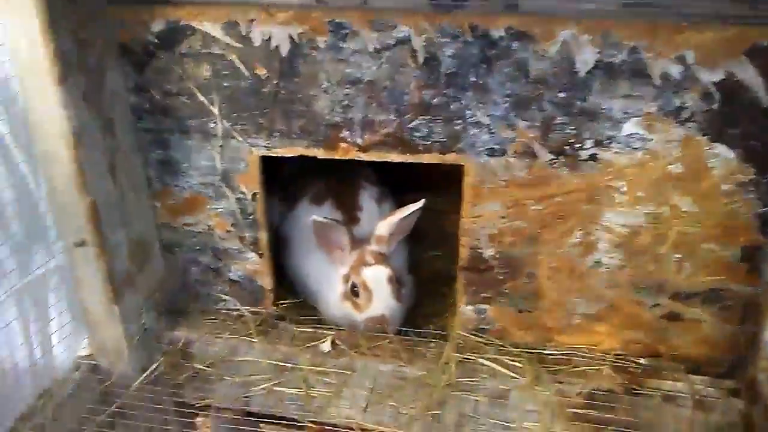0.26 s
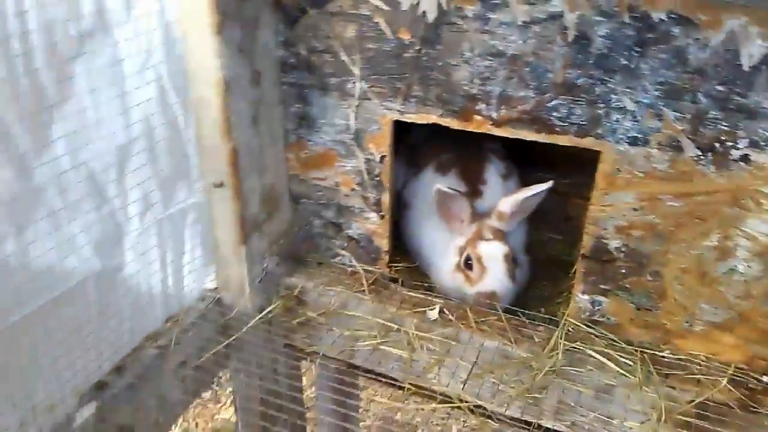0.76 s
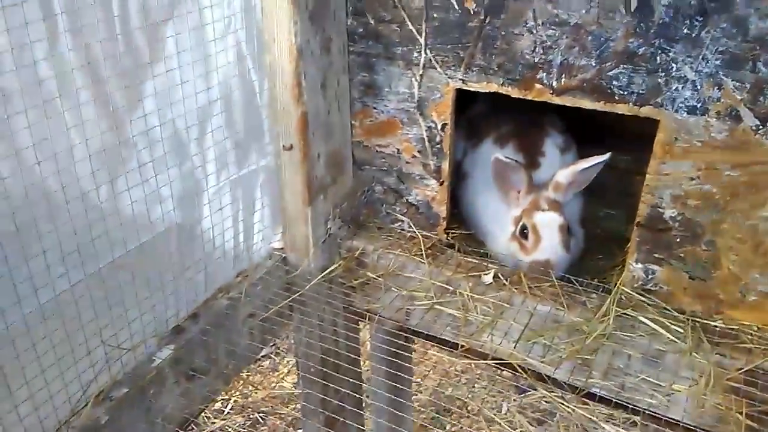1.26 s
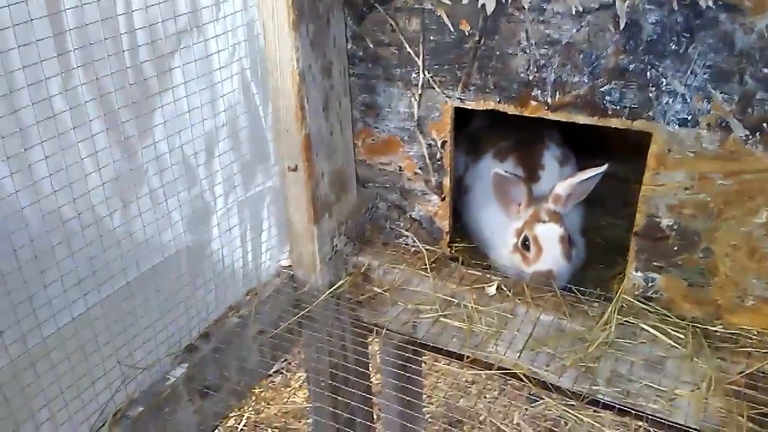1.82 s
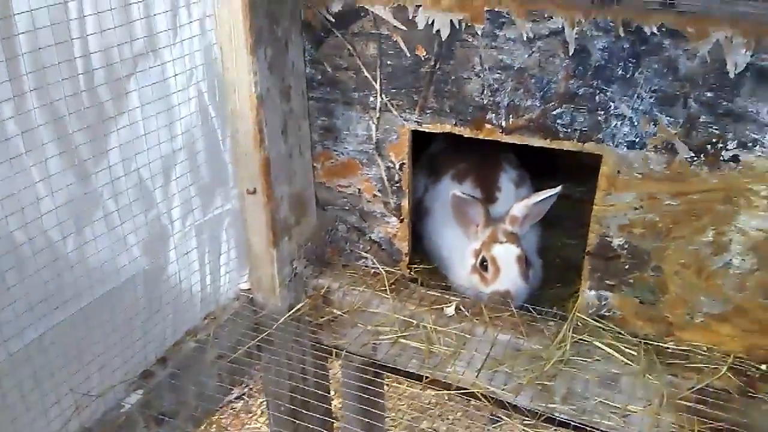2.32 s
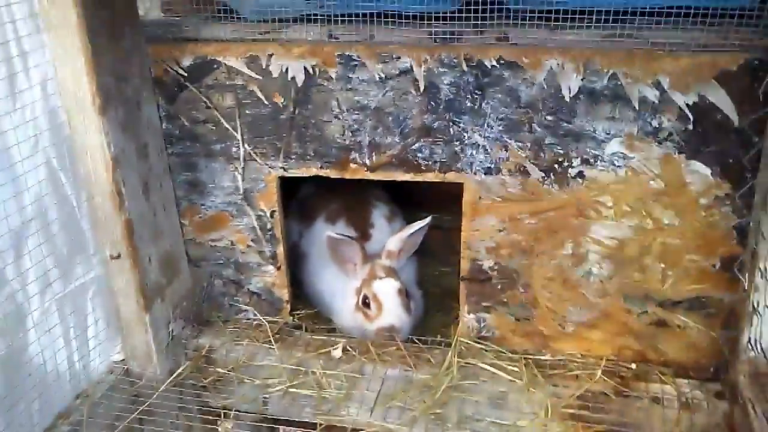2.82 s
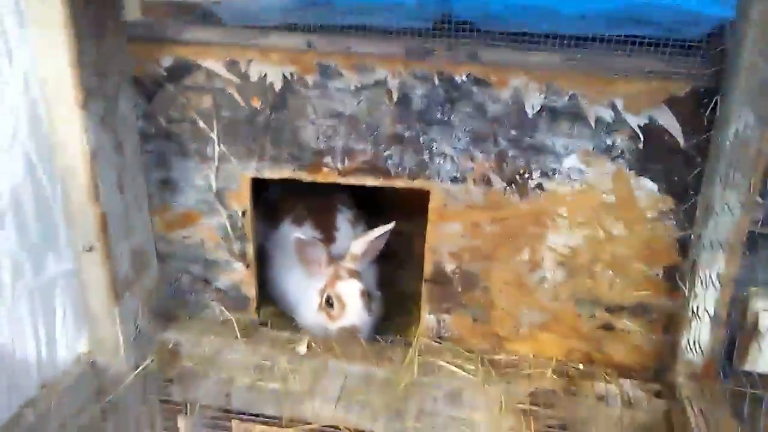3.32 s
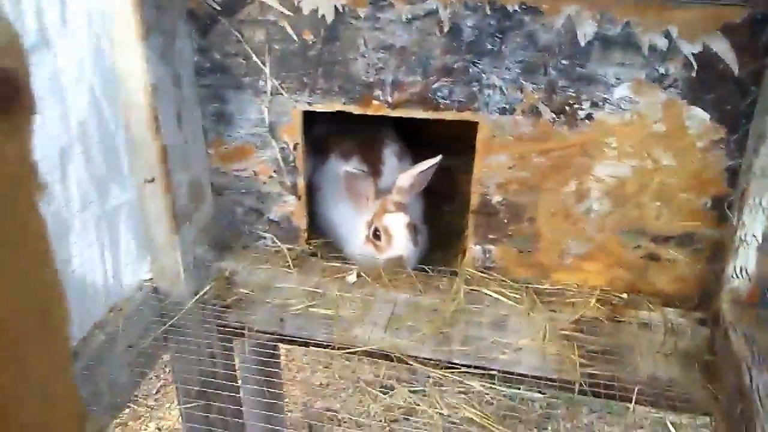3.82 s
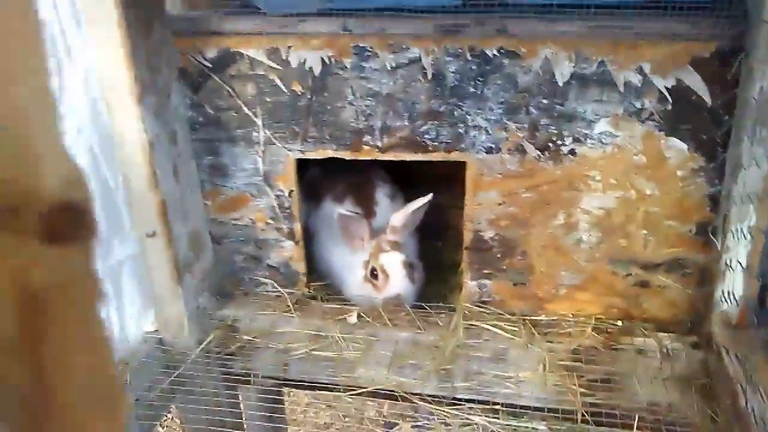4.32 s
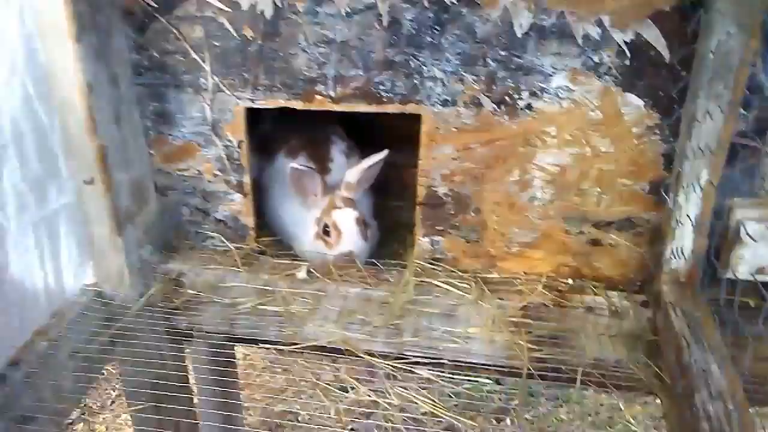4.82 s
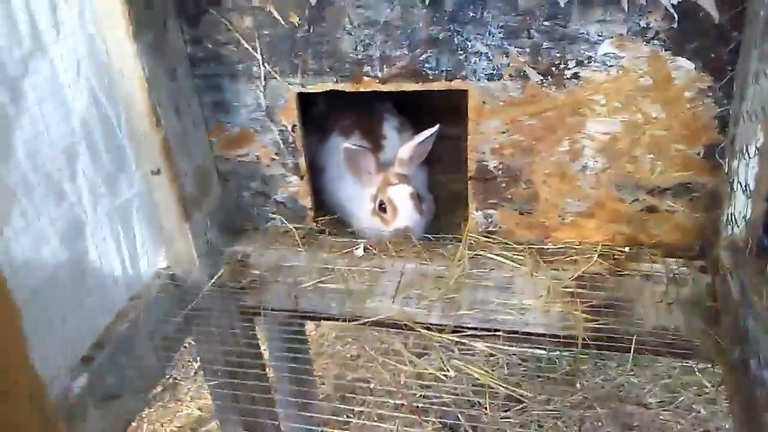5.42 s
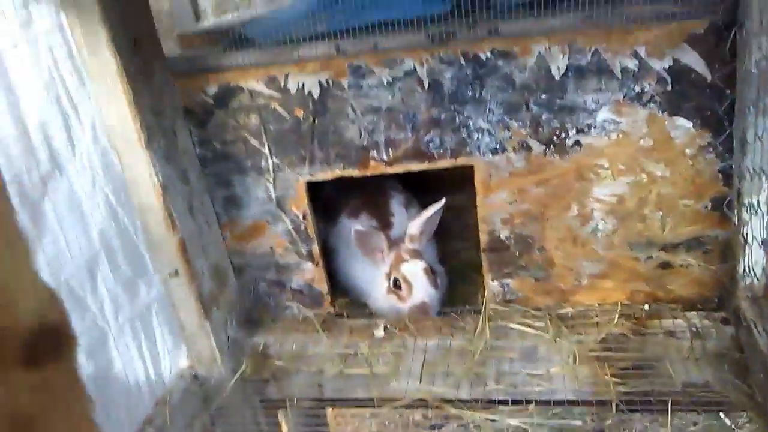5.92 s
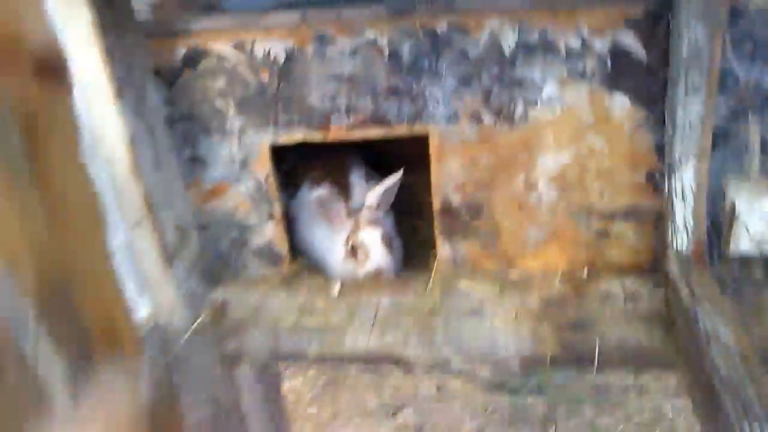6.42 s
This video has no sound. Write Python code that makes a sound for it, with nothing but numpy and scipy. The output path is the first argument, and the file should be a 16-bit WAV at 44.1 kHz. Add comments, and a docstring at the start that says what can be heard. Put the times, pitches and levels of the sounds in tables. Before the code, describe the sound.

Close handling noise over a quiet bed: crisp straw bursts with brief squeaks, a cloth scrape midway, then sharp clicks and soft bumps.

```python
"""Rummaging in a straw-filled hutch

Someone leans into a wooden rabbit hutch outdoors with a hand-held camera. Straw crunches in bursts of
noise, with a floor thud and ringing wire; the wire also squeaks as wavering tones. A sleeve scrapes
as rasping and hissing noise, and fingers click and bump on the camera's case as decaying tones and thuds.
Below lie shaped noises for rumble, handling, rustling and hiss, and a faint hollow note."""
import sys
import numpy as np
from scipy import signal
from scipy.fft import rfft, irfft, next_fast_len
from scipy.io import wavfile
from scipy.ndimage import uniform_filter1d, map_coordinates

SR = 44100
rng = np.random.default_rng(int(sys.argv[2]) if len(sys.argv) > 2 else 0)


def materialize(psi):
    """Save the field psi as 16-bit PCM at rate SR to the path in sys.argv[1].

    A 1-D psi becomes a single channel; in a 2-D psi each row is a channel.
    """
    bounded = np.clip(np.atleast_2d(psi).T, -1, 1)
    quanta = np.round(bounded * 32767).astype(np.int16)
    wavfile.write(sys.argv[1], SR, quanta)


N = 293750  # length in samples

# In every spectrum table, level_db only shapes the colour: noise() sets the overall loudness to 1.
# colour of low knocks, through the hand or the floor: pitch_hz [Hz], level_db [dB]
HANDLING_COLOUR = [(65, -24), (110, 5.5), (135, 7.5), (156, -2), (193, -1), (247, -3), (289, -7), (377, -8),
                   (585, -13.5), (900, -18.5), (1170, -28.5), (1980, -120)]
# colour of crisp, breaking straw, also used for the grit of clicks: pitch_hz [Hz], level_db [dB]
CRISP_COLOUR = [(2500, -24), (4000, -8.5), (5400, -13), (6500, 0.5), (7600, -5.5), (8400, -3),
                (10500, -11.5), (12600, -16.5), (13800, -28), (16000, -33)]


def amp(db):
    """Turn decibels into gain."""
    return 10 ** (np.asarray(db) / 20)


def unit(x):
    """Scale to an rms (average strength) of 1."""
    return x / np.sqrt(np.mean(x ** 2) + 1e-20)


def clock():
    """The time of every sample, in seconds."""
    return np.arange(N) / SR


def curves(rows):
    """Draw straight lines between the rows: one value per sample for each column after the time."""
    times, *columns = np.transpose(rows)
    return [np.interp(clock(), times, column) for column in columns]


def wobble(rate):
    """A smooth random curve through rate random points a second."""
    knots = rng.standard_normal(int(N * rate / SR) + 4)
    return map_coordinates(knots, [clock() * rate])


def filtered(x, response):
    """Multiply the spectrum of x by a (possibly complex) response to frequency."""
    padded = next_fast_len(N + SR // 2)
    spectrum = rfft(x, padded) * response(np.fft.rfftfreq(padded, 1 / SR))
    return irfft(spectrum, padded)[:N]


def noise(spectrum, grain_db=0):
    """Coloured noise of rms 1; grain_db clumps it into tiny snaps about a millisecond long."""
    pitch_hz, level_db = np.transpose(spectrum)
    clumps = amp(grain_db * wobble(1200))

    def colour(hz):
        return amp(np.interp(np.log(hz + 1), np.log(pitch_hz), level_db, left=-120, right=-120))

    return unit(filtered(clumps * rng.standard_normal(N), colour))


def add(track, start_s, sound):
    """Mix a sound into a track at a start time."""
    room = track[max(round(start_s * SR), 0):][:len(sound)]
    room += sound[:len(room)]


def ramp(u):
    """A smooth step from 0 to 1."""
    return np.sin(np.pi / 2 * np.clip(u, 0, 1)) ** 2


def span(start_s, length_s, rise_s, fall_s):
    """An envelope that rises and falls within its length, holding between if there is time."""
    t = clock() - start_s
    return ramp(t / rise_s) * ramp((length_s - t) / fall_s)


def swell(length_s, hz):
    """A tone that swells and fades within its length."""
    t = np.arange(int(length_s * SR)) / SR
    return np.sin(np.pi * t / length_s) ** 2 * np.sin(2 * np.pi * hz * t)


def narrow(hz, width_hz):
    """A fuzzy tone of rms 1 at a fixed or moving pitch: two waves whose strengths wander."""
    phase = 2 * np.pi * np.cumsum(hz * np.ones(N)) / SR
    return unit(wobble(2 * width_hz) * np.cos(phase) + wobble(2 * width_hz) * np.sin(phase))


def stalks(per_second, spread_db, t60):
    """The envelope, of rms 1, of many small contacts of uneven size, each dying away by 60 dB in t60 seconds."""
    sizes = amp(spread_db * np.clip(rng.standard_normal(N), -2, 2))
    hits = (rng.random(N) < per_second / SR) * sizes
    t = np.arange(SR // 10) / SR
    power = signal.fftconvolve(hits ** 2, amp(-60 * t / t60) ** 2)[:N]
    return unit(np.sqrt(np.abs(power)))


def patches(x, depth_db):
    """Resonances that come and go as the point of contact moves: random smooth patches of gain."""
    z = signal.stft(x, nperseg=512)[2]
    field = uniform_filter1d(rng.standard_normal(z.shape), size=6, axis=0)  # across pitch
    field = uniform_filter1d(field, size=5, axis=1)  # across time
    return unit(signal.istft(z * amp(depth_db * unit(field)), nperseg=512)[1][:N])


def boards(x, strength, reach_s, count=6):
    """Close boards send back short echoes, which dig notches into a sound's spectrum."""
    out = x.copy()
    for place, sign in zip(rng.random(count), rng.choice([-1, 1], count)):
        lag = 8 + int(place * reach_s * SR)  # samples
        out[lag:] += strength * sign * x[:-lag]
    return out / np.sqrt(1 + count * strength ** 2)


def hutch(x, t60):
    """The small wooden box answers briefly and dully, like a fading burst of noise."""
    t = np.arange(SR // 3) / SR
    dull = signal.butter(1, 3500, fs=SR, output="sos")
    tail = signal.sosfilt(dull, rng.standard_normal(len(t)))
    tail = tail * amp(-60 * t / t60) * ramp(t / 0.0093)
    return signal.fftconvolve(x, tail / np.linalg.norm(tail))[:N]


def mesh(x):
    """What the wire mesh rings with when x shakes it: a few narrow resonances."""
    # resonances of the wires: pitch_hz [Hz], width_hz [Hz], level_db [dB]
    wires = [(1344, 60, 1.5), (2558, 123, 0.5), (4644, 37.6, 7.5), (5370, 22, 3.5), (6650, 56, -26),
             (8020, 43, -1)]

    def ringing(f):
        return sum(amp(level_db) * 1j * f * width_hz
                   / (pitch_hz * pitch_hz - f * f + 1j * f * width_hz)
                   for pitch_hz, width_hz, level_db in wires)

    return filtered(x, ringing)


def mic_hiss():
    """The microphone's own faint, steady hiss."""
    # colour of the hiss: pitch_hz [Hz], level_db [dB]
    hiss_colour = [(700, 2.5), (5000, -3.5), (15000, -2.5), (16000, -28)]
    return amp(-69.5) * noise(hiss_colour)


def hand():
    """The holding hand jostles the camera; moving air rumbles below it."""
    # course of the low handling noise: time_s [s], level_db [dB before the lift below]
    handling_course = [(0.0, -55.5), (0.41, -50.5), (1.05, -54.5), (1.22, -47), (1.93, -49), (2.26, -53),
                       (2.69, -57.5), (3.0, -53.5), (3.28, -61), (3.49, -61), (3.75, -55.5), (4.19, -55.5),
                       (4.34, -60), (4.62, -62.5), (5.6, -55), (5.73, -53.5), (6.19, -52.5), (6.66, -53.5)]
    # course of the deep rumble: time_s [s], level_db [dB before the lift below]
    rumble_course = [(0.0, -57.5), (0.55, -56.5), (1.04, -54), (1.26, -48), (1.63, -55.5), (2.24, -53.5),
                     (2.37, -57), (3.02, -56), (3.38, -65), (3.54, -55), (3.69, -56), (4.01, -56.5),
                     (4.27, -53), (4.92, -59.5), (5.53, -55.5), (5.75, -45), (6.23, -52), (6.66, -61.5)]
    # colour of the deep rumble: pitch_hz [Hz], level_db [dB]
    rumble_colour = [(12, -39), (20, -21), (36, -6.5), (54, 11.5), (97, 2.5), (130, -9), (157, -11),
                     (170, -2.5), (220, -17), (370, -120)]
    handling_lift_db, jostle_db = -0.5, 2.5  # added to the course; size of quick swings
    rumble_lift_db, gust_db = 4, 1  # the same for the rumble
    handling_db, = curves(handling_course)
    rumble_db, = curves(rumble_course)
    handling_gain = amp(handling_db + handling_lift_db + jostle_db * wobble(20))
    handling = handling_gain * noise(HANDLING_COLOUR)
    rumble_gain = amp(rumble_db + rumble_lift_db + gust_db * wobble(12))
    rumble = rumble_gain * noise(rumble_colour)
    return handling + rumble


def drone():
    """A faint hollow note flickers in the low noise; now and then it swells and sinks in pitch."""
    # swells: start_s [s], length_s [s], middle pitch_hz [Hz], level_db [dB before the flicker]
    hollow_swells = [(0.249, .36, 450, -56), (0.519, 0.39, 240, -53.5), (1.001, 1.26, 200, -56.5),
                     (2.797, 0.45, 377, -62), (4.015, 0.29, 366, -56), (4.899, 0.5, 389, -56.5),
                     (6.327, .36, 340, -49.5)]
    rest_hz, rest_db = 394.4, -68.5  # the note that is always there, before its wander and flicker
    sag_octaves, width_hz = .55, 75  # how far a swell sinks; how fuzzy the note is
    out = amp(rest_db) * narrow(rest_hz * (1 + .12 * wobble(3)), width_hz)
    for start_s, length_s, pitch_hz, level_db in hollow_swells:
        progress = np.clip((clock() - start_s) / length_s, 0, 1)
        pitch = pitch_hz * 2 ** (sag_octaves * (.5 - progress))
        shape = span(start_s, length_s, length_s / 2, length_s / 2)
        out += amp(level_db) * shape * narrow(pitch, width_hz)
    flicker = amp(2.5 * wobble(14))
    return out * flicker


def stirring():
    """Clothes and straw stir softly with every shift of the body, in many small contacts."""
    # shifts of the body: start_s [s], length_s [s], rub_db [dB], rustle_db [dB]
    shifts = [(-.1, 0.26, -60.5, -60), (0.124, 0.41, -59.5, -56.5), (0.262, .31, -51, -55),
              (0.504, 0.39, -64, -60.5), (0.863, .2, -71, -57), (0.922, 0.6, -48.5, -57.5),
              (1.415, 0.92, -60.5, -61.5), (1.626, 0.48, -52, -63), (1.95, 0.48, -70, -69),
              (3.026, 0.17, -72, -68), (3.226, 0.57, -66, -62), (3.936, 0.39, -55.5, -54.5),
              (4.275, 0.4, -62.5, -60), (4.552, 0.76, -69, -70.5), (4.88, 0.15, -65.5, -64.5),
              (5.07, 0.44, -66.5, -62), (5.45, 0.41, -55.5, -56), (5.754, 0.74, -56, -57.5),
              (6.39, 0.21, -54.5, -58.5), (6.597, 0.6, -48.5, -49)]
    # colours of rubbing clothes and rustling straw: pitch_hz [Hz], level_db [dB]
    rub_colour = [(320, -9), (550, -2), (1140, -4.5), (1310, -7.5), (1510, -7), (1810, -7.5), (2160, -11),
                  (2620, -9), (3650, -13.5), (5000, -12), (6500, -21), (11000, -120)]
    rustle_colour = [(2060, -26), (3500, -9.5), (4370, -16), (4810, -18.5), (5260, -5), (8210, 0),
                     (8860, -1.5), (14500, -12), (16000, -18)]
    still_rub_db, still_rustle_db = -70, -79  # always present, also between shifts
    rise_share, fall_share = 0.15, 0.45  # of a shift's length
    mesh_rub_db = -21  # how much rubbing shakes the wire
    rub_power, rustle_power = amp(still_rub_db) ** 2, amp(still_rustle_db) ** 2
    for start_s, length_s, rub_db, rustle_db in shifts:
        shape = span(start_s, length_s, rise_share * length_s, fall_share * length_s)
        rub_power = rub_power + amp(rub_db) ** 2 * shape
        rustle_power = rustle_power + amp(rustle_db) ** 2 * shape
    contacts = stalks(per_second=220, spread_db=4, t60=.03) ** 2
    # part of each sound is steady, part follows the contacts
    rub_gain = np.sqrt(rub_power * (.65 + .35 * contacts))
    rub = rub_gain * patches(noise(rub_colour, grain_db=1.8), depth_db=2)
    rustle_gain = np.sqrt(rustle_power * (.8 + .2 * contacts))
    rustle = rustle_gain * patches(noise(rustle_colour, grain_db=1.2), depth_db=1.5)
    return rub + amp(mesh_rub_db) * mesh(rub) + rustle


def squeaks():
    """Wire slips briefly against wood: short tones whose unsteady phase makes them rough."""
    # squeaks: start_s [s], length_s [s], pitch_hz [Hz], width_hz [Hz], level_db [dB]
    wire_slips = [(1.112, .032, 1620, 90, -34), (1.112, .06, 6860, 60, -47), (1.11, .036, 8700, 900, -42),
                  (1.11, .036, 11000, 1200, -42), (1.969, .032, 3880, 300, -40.5),
                  (1.971, .025, 7030, 80, -41.5), (6.06, .17, 2680, 260, -56), (6.1, .17, 3770, 260, -57)]
    out = np.zeros(N)
    for start_s, length_s, pitch_hz, width_hz, level_db in wire_slips:
        t = np.arange(int(length_s * SR)) / SR
        # the slip's phase wanders, which widens its line
        steps = np.resize(rng.standard_normal(SR // 4), len(t))
        drift = np.cumsum(steps) * np.sqrt(np.pi * width_hz / SR)
        drift = uniform_filter1d(drift, size=40)
        shape = np.sin(np.pi * t / length_s) ** 2
        tone = np.sqrt(2) * np.sin(2 * np.pi * pitch_hz * t + drift)
        add(out, start_s, amp(level_db) * shape * tone)
    return out


def bumps():
    """Fingertips push on the case, as fading noise with a duller or brighter top; the arm thumps lower still."""
    # soft bumps of the hand: start_s [s], level_db [dB], brightness_hz [Hz], t60_s [s]
    soft_bumps = [(.275, -43.5, 600, 0.15), (2.189, -43, 497, .092), (3.598, -36, 1180, 0.034),
                  (3.668, -42.5, 500, 0.21), (5.13, -41.5, 216, 0.24), (5.55, -44.5, 387, 0.6),
                  (5.2, -49, 1200, 0.14), (5.648, -29, 1300, 0.047), (5.661, -24, 1500, 0.038),
                  (5.792, -42.5, 3030, 0.015), (5.8788, -27, 498, 0.033), (5.8885, -23, 1250, 0.024),
                  (5.891, -23, 220, .11), (5.931, -36, 2060, 0.053), (6.0302, -32, 1200, .047),
                  (6.067, -29.5, 2060, 0.051), (6.169, -30.5, 1490, 0.019), (6.61, -33, 1900, 0.016)]
    # the arm meets the frame: start_s [s], length_s [s], pitch_hz [Hz], level_db [dB]
    arm_thumps = [(0.709, 0.11, 66.4, -42), (4.167, .12, 49.7, -31)]
    out, t = np.zeros(N), np.arange(SR // 3) / SR
    for start_s, level_db, brightness_hz, t60_s in soft_bumps:
        edges = [60, np.clip(brightness_hz, 100, 8000)]
        band = signal.butter(2, edges, "band", fs=SR, output="sos")
        thud = unit(signal.sosfilt(band, rng.standard_normal(len(t))))
        add(out, start_s, amp(level_db - 60 * t / t60_s) * thud)
    for start_s, length_s, pitch_hz, level_db in arm_thumps:
        add(out, start_s, amp(level_db) * swell(length_s, pitch_hz))
    return out


def sleeve():
    """Cloth drags over the rough wooden frame: pressure makes it rasp, speed makes it hiss."""
    # strokes: start_s [s], length_s [s], rasp_db [dB], hiss_db [dB]
    strokes = [(3.539, 0.12, -47.5, -54.5), (3.596, 0.11, -25.5, -34.5), (3.669, .1, -32.5, -43),
               (3.745, 0.18, -41.5, -52.5), (3.866, 0.11, -51, -39), (3.92, 0.045, -44, -28),
               (3.961, 0.074, -42.5, -38.5), (4.019, 0.07, -38, -44), (4.064, 0.09, -46, -41.5),
               (4.129, 0.074, -45, -36.5), (4.226, .1, -43, -34.5), (4.421, 0.07, -68, -47.5)]
    # colours of the rasp and of the hiss: pitch_hz [Hz], level_db [dB]
    rasp_colour = [(230, -15), (400, -13), (900, -13), (1400, -7), (2150, -0.5), (2800, -8), (3350, -3),
                   (4500, -20.5), (5700, -6.5), (7200, -11.5), (8400, -4), (11300, -8), (13500, -12),
                   (16000, -24)]
    slide_colour = [(700, -28), (1500, -3.5), (2100, -2), (3500, -1), (4600, -3.5), (6100, 3.5), (7400, 1),
                    (8800, 2.5), (10500, -5.5), (12500, -12), (16000, -23)]
    light_rise_s, fall_s = 0.03, 0.046  # a light stroke's start; every stroke's end
    bite_db = -31  # around this level and above, a stroke catches much faster
    rasp_power, hiss_power = np.zeros(N), np.zeros(N)
    for start_s, length_s, rasp_db, hiss_db in strokes:
        rise_s = light_rise_s / (1 + amp(max(rasp_db, hiss_db) - bite_db) ** 4)
        shape = span(start_s, length_s, rise_s, fall_s)
        # overlapping strokes add in power
        rasp_power += (amp(rasp_db) * shape) ** 2
        hiss_power += (amp(hiss_db) * shape) ** 2
    grit = patches(noise(rasp_colour, grain_db=3), depth_db=2.5)
    slide = patches(noise(slide_colour, grain_db=2.2), depth_db=1.5)
    # light pressure rasps more dully
    dull = filtered(grit, lambda hz: 1 / (1 + (hz / 5000) ** 4))
    pressure = rasp_power / (rasp_power + amp(-30.5) ** 2)
    rasping = np.sqrt(rasp_power) * (dull + pressure * (grit - dull))
    hissing = np.sqrt(hiss_power) * slide
    catching = amp(1.25 * wobble(130))  # quick unevenness
    return catching * (rasping + hissing)


def clicks():
    """A nail snaps on the case: one sharp tick, a short rattle, and the case's modes, which shift with the grip."""
    # sharp contacts, mostly of fingernails:
    # start_s [s], tick_db [peak dB], pitch_hz [Hz], t60_s [s], ring_db [dB]
    contacts = [(3.5995, -14.5, 2250, .006, -29.5), (4.1445, -23, 7000, 0.00079, -48),
                (4.4455, -21, 7700, 0.0016, -63), (5.235, -35, 8000, .002, -70),
                (5.47, -37, 9500, 0.0024, -61), (5.5452, -27, 5840, 0.0032, -60),
                (5.6352, -14.5, 8700, 0.0017, -34.5), (5.6608, 0.5, 8170, 0.0011, -15.5),
                (5.873, -6.5, 6450, 0.0023, -29), (5.9309, -27.5, 6070, .0061, -34),
                (6.0128, -11.5, 7030, 0.0033, -35), (6.0716, -28.5, 6420, 0.0035, -50),
                (6.253, -26.5, 3435, 0.0042, -44), (6.4076, -5, 5960, 0.0013, -29),
                (6.612, -25.5, 6000, 0.0036, -41.5)]
    # modes (ringing tones) of the case: mode_hz [Hz], mode_db [dB], mode_t60_s [s]
    case_modes = [(516, -23, 0.024), (730, -4, 0.019), (1370, -0.5, 0.018), (2090, -9, 0.024),
                  (2920, -0.5, 0.015), (4010, -2.5, 0.053), (4310, -1, 0.019), (5000, 1.5, 0.02),
                  (6940, -7, .012), (8950, -14, 0.0089)]
    out, t = np.zeros(N), np.arange(SR // 10) / SR
    grit = noise(CRISP_COLOUR)
    rattle_shape = amp(-17 - 60 * t / .012) + amp(-32 - 60 * t / .06)  # a fast and a slow fade
    # the finger lands after the nail and damps the case
    damping = 1 / (1 + (t / .01) ** 4)
    for start_s, tick_db, pitch_hz, t60_s, ring_db in contacts:
        tick = np.sin(2 * np.pi * pitch_hz * t) * amp(-60 * t / t60_s)
        rattle = np.resize(grit[round(start_s * SR):], len(t)) * rattle_shape
        grip = 1 + rng.normal(0, 0.04)  # one pitch shift for all modes
        ring = np.zeros(len(t))
        for mode_hz, mode_db, mode_t60_s in case_modes:
            fade = amp(mode_db + rng.normal(0, 1) - 60 * t / mode_t60_s)
            ring += fade * np.sin(2 * np.pi * (grip * mode_hz * t + rng.random()))
        snap = amp(tick_db) * (tick + rattle)
        add(out, start_s, snap + amp(ring_db) * ring * damping * ramp(t / 0.0018))
    return out


def straw():
    """Each crunch is a quick avalanche of breaking fibres, coloured by its spot; floor and mesh sound along."""
    # straw giving way: start_s [s], t60_s [s], body_db [dB], crisp_db [dB],
    # sheen_db [dB, lift of the highest treble]
    crunches = [(0.016, 0.11, -49.5, -43, 1), (0.51, 0.054, -57, -42.5, 1), (.569, .11, -54.5, -48, -4),
                (0.603, 0.069, -44.5, -46, 1), (.618, 0.077, -45.5, -39.5, -5),
                (0.688, 0.13, -52.5, -43, -2), (.844, .056, -77, -49, -2), (1.013, 0.075, -51, -49.5, 0),
                (1.039, 0.089, -35, -35, 13), (1.075, 0.036, -36.5, -30, -7), (1.121, 0.036, -50, -40, 16),
                (1.169, 0.27, -50, -52, -1), (1.22, 0.12, -33, -38, 11.5), (1.246, 0.075, -42, -41, 0),
                (1.315, 0.29, -55, -51, -3), (1.351, 0.056, -37.5, -24.5, 6.5), (1.58, .16, -48, -54, 6),
                (1.649, .11, -37.5, -34, 8), (1.665, 0.11, -45, -50, 0), (1.739, 0.058, -32, -29, -4),
                (1.9, 0.06, -31.5, -27, 7), (1.975, 0.061, -37, -36.5, 11), (2.07, 0.049, -43, -49.5, 4),
                (2.124, 0.21, -54.5, -57.5, 11), (2.185, 0.11, -50.5, -56.5, 2),
                (2.41, 0.089, -67, -60, 10), (3.213, 0.16, -58.5, -63, 0), (3.244, .18, -73, -53.5, -4),
                (3.45, 0.13, -64, -49.5, -16), (5.14, .05, -60, -57, 4), (5.338, .06, -65, -55, 12),
                (5.522, 0.068, -50.5, -43, -8), (5.567, 0.089, -73, -48, -2), (6.222, 0.034, -43.5, -41, 1),
                (6.449, 0.048, -37.5, -40, 1)]
    # colour of the straw's body: pitch_hz [Hz], level_db [dB]
    body_colour = [(200, -8), (330, -3), (550, -13), (950, -2.5), (1250, -8.5), (1650, -1), (2000, -3.5),
                   (2400, -1), (2900, -6), (3350, -2), (4000, -16.5), (5500, -5.5), (7000, -29)]
    rise_share = .055  # share of its t60 that a crunch takes to build up
    sheen_hz = 10900  # where the highest treble begins
    floor_db, floor_t60_s = -14, 0.33  # the floor's thud, against the crunch's body
    out, t = np.zeros(N), np.arange(SR // 5) / SR
    body = noise(body_colour, grain_db=4.5)
    crisp = noise(CRISP_COLOUR)
    floor = noise(HANDLING_COLOUR)
    sheen = filtered(crisp, lambda hz: 1 - 1 / (1 + (hz / sheen_hz) ** 10))
    for start_s, t60_s, body_db, crisp_db, sheen_db in crunches:
        # the stretch of the noises that this crunch uses
        part = np.minimum(round(start_s * SR) + np.arange(len(t)), N - 1)
        rise_s = rise_share * t60_s
        shape = ramp(t / rise_s) * amp(-60 * np.maximum(t - rise_s, 0) / t60_s)
        treble = crisp[part] + (amp(sheen_db) - 1) * sheen[part]
        crunch = shape * (amp(body_db) * body[part] + amp(crisp_db) * treble)
        thud_gain = amp(body_db + floor_db - 60 * t / floor_t60_s)
        thud = thud_gain * ramp(t / rise_s) * floor[part]
        add(out, start_s, boards(crunch, strength=.22, reach_s=.002) + thud)
    return out + mesh(out)


def scene():
    """Straw and wire sound inside the hutch; sleeve and fingers are right at the microphone."""
    bed = mic_hiss() + hand() + drone() + stirring()
    near = bumps() + sleeve() + clicks()
    inside = squeaks() + straw()
    echo = amp(-8.5) * hutch(inside, t60=0.082)
    return (inside + echo + near + bed)[None]


def record(dry):
    """The camera keeps almost nothing above its band limit: a very steep treble cut."""
    top_hz = 15900
    return np.array([filtered(channel, lambda hz: 1 / (1 + (hz / top_hz) ** 120)) for channel in dry])


dry = scene()
out = record(dry)
materialize(out)
```